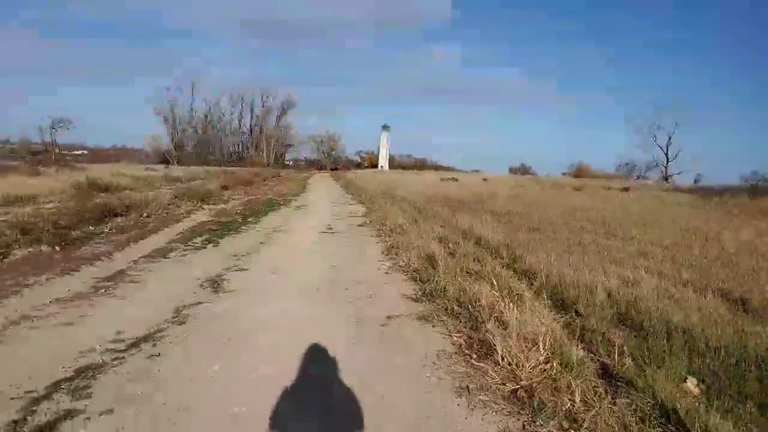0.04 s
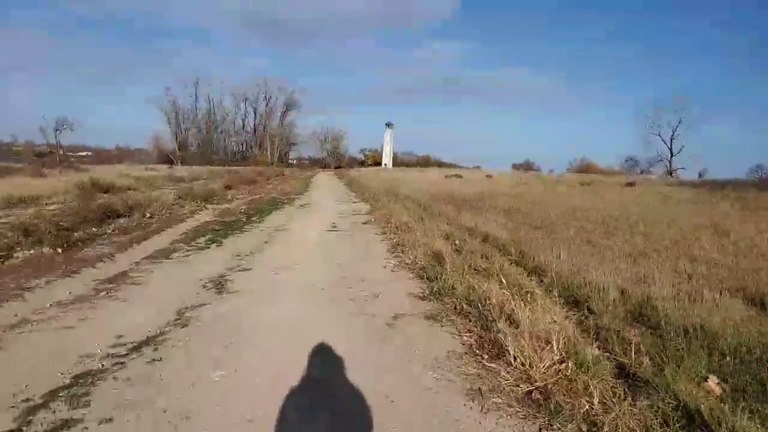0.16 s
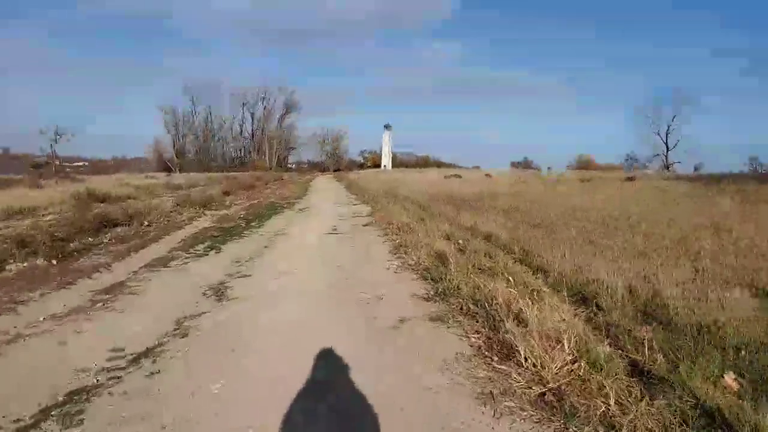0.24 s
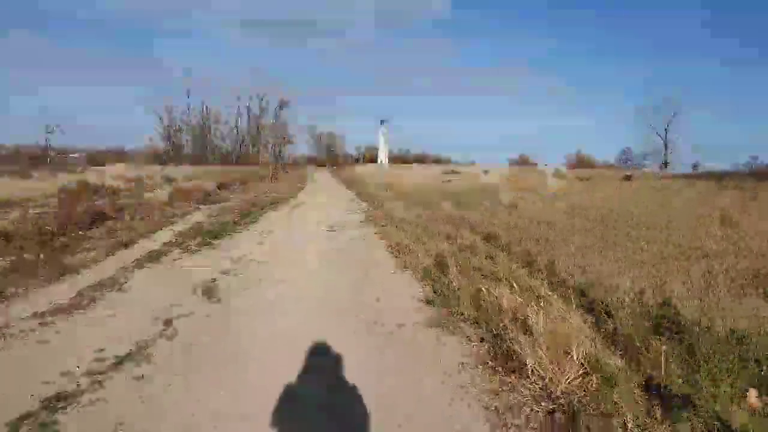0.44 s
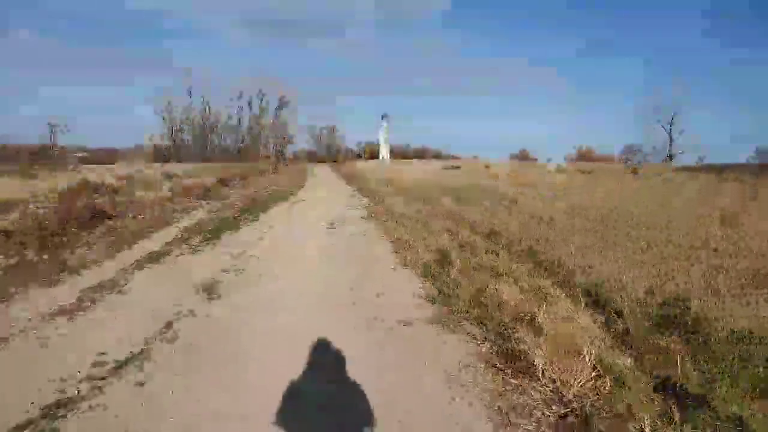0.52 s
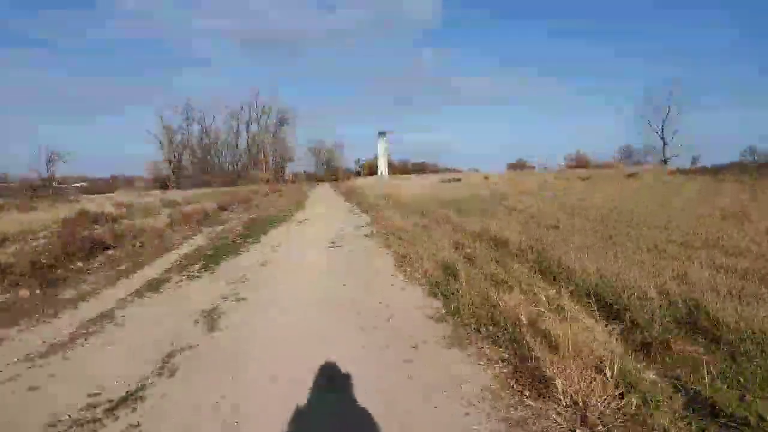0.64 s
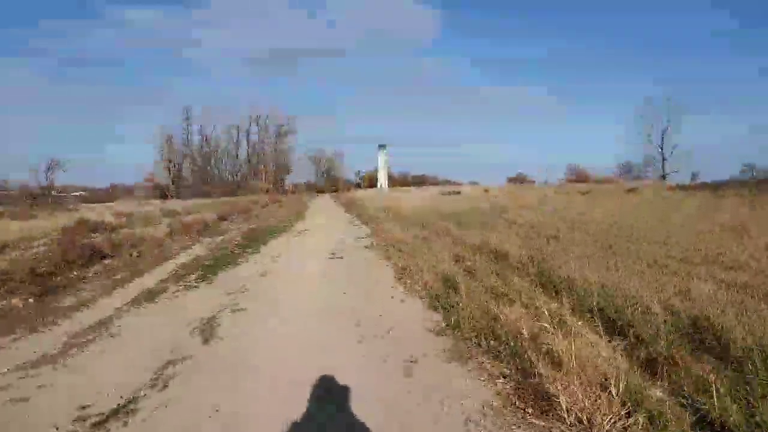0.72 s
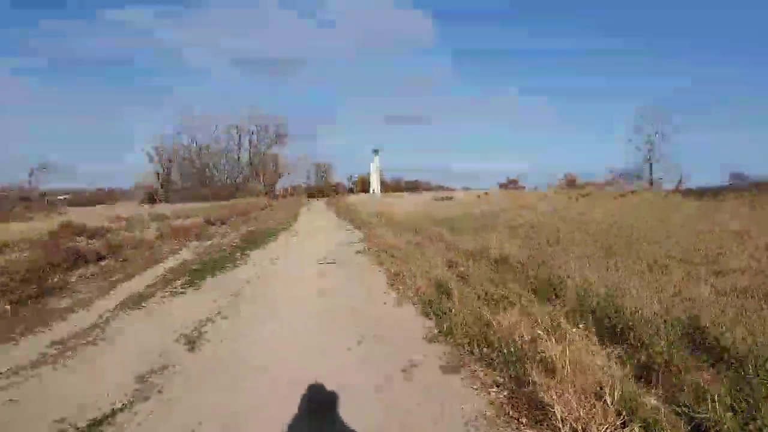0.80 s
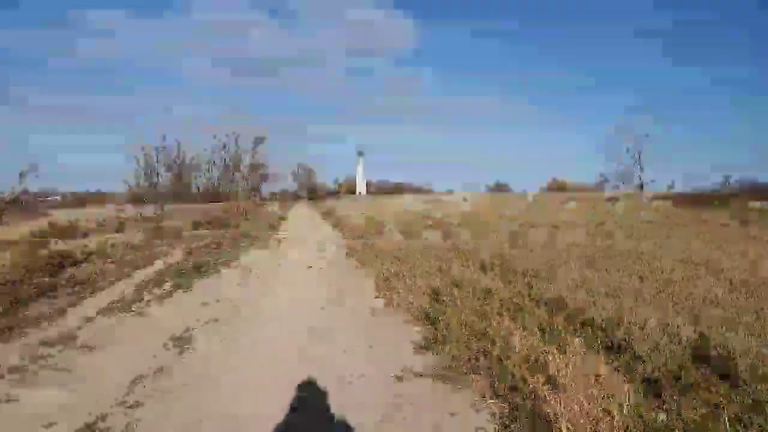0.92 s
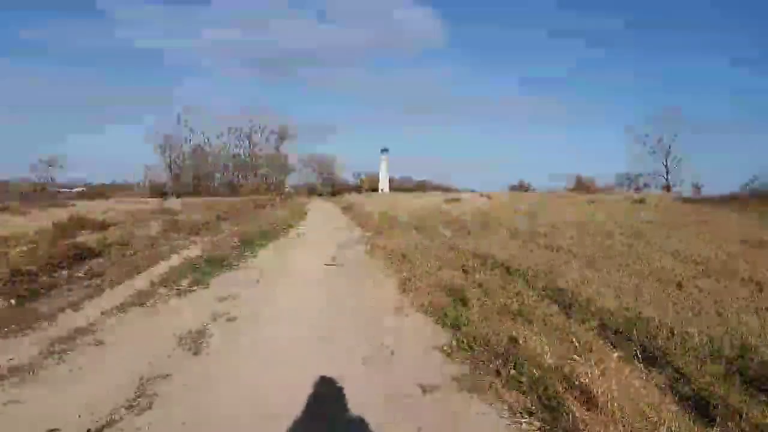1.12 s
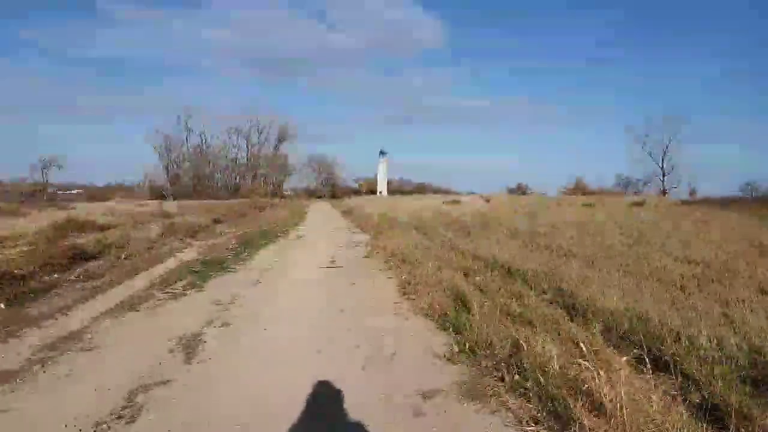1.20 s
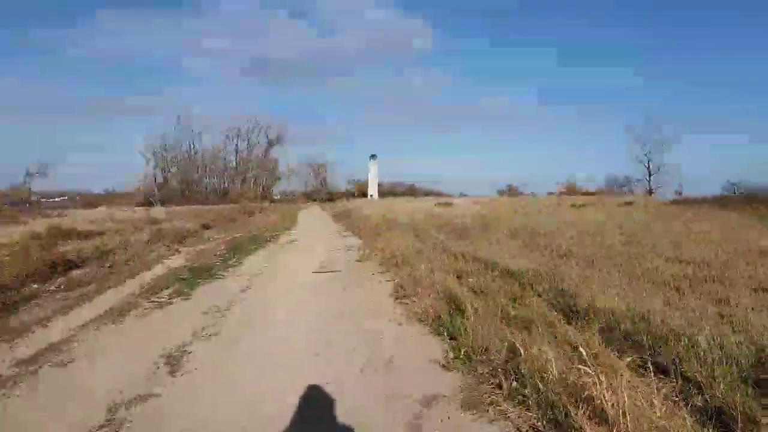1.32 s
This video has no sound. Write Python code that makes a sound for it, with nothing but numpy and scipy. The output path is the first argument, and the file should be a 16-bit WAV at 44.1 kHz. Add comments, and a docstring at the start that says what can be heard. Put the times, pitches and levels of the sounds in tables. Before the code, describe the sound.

Footsteps scuff and crunch lightly on a sandy track in open country while wind rumbles and puffs against the microphone. One sharp click sounds close by, then the wind drops, leaving thin hiss and faint insects.

```python
"""Someone walks along a sandy track in open country, carrying a microphone in the wind.
From the start gusts rumble and flutter in its two ports, over a thin hiss and faint insects.
Soles scuff the sand and crack grit while eddies strike as puffs, the hardest at 0.36 s.
One sharp click sounds close by at 0.52 s, and a second run of puffs follows. After 0.9 s the wind
drops away, and at 1.3 s a sole slides over loose sand as the next step begins."""
import sys
import numpy as np
from scipy import signal
from scipy.fft import rfft, irfft
from scipy.io import wavfile

SR = 44100
rng = np.random.default_rng(int(sys.argv[2]) if len(sys.argv) > 2 else 0)


def inscribe(sig):
    """Save sig as 16-bit PCM at rate SR to the path in sys.argv[1].

    A 1-D sig is mono; a 2-D sig holds one channel per row.
    Samples are clipped to [-1, 1] before scaling.
    """
    pcm = np.round(np.clip(np.atleast_2d(sig).T, -1, 1) * 32767)
    wavfile.write(sys.argv[1], SR, pcm.astype(np.int16))


N = 59535
TIME = np.arange(N) / SR
GRIT_LIKENESS, SAND_LIKENESS = 0.79, 0.67  # left-right correlation
# spectrum of a brittle crack (frequency [Hz], relative level [dB])
CRACK_SPECTRUM = [(200, -16), (700, 4.5), (1300, 1), (2000, 3.5), (2500, -3), (3500, 3), (4700, -4.5),
                  (6000, -6), (10000, -2.5), (15000, -26)]


def wind():
    """Turbulent pressure at the ports: a low rumble, and a hollow flutter that brightens in gusts."""
    # envelopes of flutter and rumble (time [s], relative level [dB])
    gusts = [(0, -49), (.022, -34.5), (.06, -41), (.095, -35), (.135, -42), (.185, -36), (.232, -28.5),
             (.265, -36), (.302, -28), (.318, -34.5), (.364, -23), (.39, -30.5), (.445, -40), (.485, -30),
             (.51, -39), (.565, -42), (.582, -35.5), (.61, -42), (.64, -26), (.68, -27), (.715, -35),
             (.745, -37), (.768, -33.5), (.795, -39.5), (.86, -40.5), (.9, -61.5), (.935, -51.5),
             (.96, -51), (.995, -54), (1.05, -71), (1.13, -64), (1.2, -75.5), (1.35, -72.5)]
    swells = [(0, -41.5), (.2, -43), (.232, -35), (.27, -42.5), (.36, -28), (.435, -40.5), (.485, -33),
              (.56, -32), (.6, -38.5), (.65, -32), (.725, -32), (.81, -37), (.845, -34.5), (.885, -50.5),
              (.97, -53.5), (1.0, -42), (1.03, -69), (1.09, -66), (1.13, -59), (1.2, -77.5), (1.25, -62.5),
              (1.35, -65)]
    # their spectra (frequency [Hz], relative level [dB])
    flutter_spectrum = [(30, -31), (120, -13.5), (220, -5.5), (310, -5), (380, -1.5), (520, -10),
                        (750, -14.5), (1100, -23), (1600, -33), (3000, -56.5), (8000, -58.5)]
    rumble_spectrum = [(10, -23), (30, -10.5), (48, -5), (70, 4), (110, -5.5), (170, -11.5), (300, -25.5),
                       (1000, -65)]
    lump_db, bright_from_db, bright_per_db = 3.5, -27.5, 0.0868
    gust_db = curve(gusts)
    flutter = turbulence(flutter_spectrum, steady_hz=30)
    flutter *= amp(lump_db * unit(lowpass(noise(), hz=73)))
    low = lowpass(flutter, hz=594)
    treble_gain = np.exp(bright_per_db * np.maximum(gust_db - bright_from_db, -10))
    flutter = low + (flutter - low) * treble_gain
    rumble = turbulence(rumble_spectrum, steady_hz=23)
    return flutter * amp(gust_db + 1.5) + rumble * amp(curve(swells) + 2.5)


def turbulence(spectrum, steady_hz):
    """Random pressure fluctuation: coloured noise, its slow level evened out by its running power."""
    pressure = colour(noise(), spectrum)
    power = abs(lowpass(pressure ** 2, steady_hz))
    return pressure / np.sqrt(power + 0.12 * np.mean(pressure ** 2))


def puffs():
    """A convected eddy swings the pressure for a cycle or two, at one port and then the other."""
    # (time [s], left peak [dB], right peak [dB], frequency [Hz], half length [s], right delay [s])
    eddies = [(.092, -28, -25, 566, 0.00076, .001), (0.201, -18, -24, 634, 0.0023, -0.0022),
              (0.2289, -15.5, -13.5, 410, .002, -.0007), (0.2395, -18, -16, 485, 0.0012, .007),
              (0.282, -26, -17.5, 384, 0.00092, -0.0064), (0.3005, -24.5, -16, 305, .002, -0.0028),
              (0.346, -20, -23, 490, 0.0027, -0.0025), (0.364, -5, -4.5, 360, .002, .0022),
              (0.3705, -13, -13.5, 390, 0.0018, .002), (0.47, -14, -21, 362, 0.0034, -0.0012),
              (0.4813, -18, -25, 353, 0.0014, 0.01), (0.4901, -19.5, -14.5, 430, 0.0013, .002),
              (0.581, -29, -37, 328, 0.0022, .001), (0.6437, -19.5, -17, 926, 0.00079, .0012),
              (0.668, -13, -10.5, 452, 0.0029, 0.004), (0.68, -8.5, -12.5, 297, 0.0026, .0003),
              (0.692, -14, -27.5, 411, .004, .002), (0.765, -20, -22.5, 350, 0.0017, .002)]
    phases = rng.random((len(eddies), 2, 1))  # in cycles
    out = np.zeros((2, N))
    for (centre, left_db, right_db, hz, half, delay), phase in zip(eddies, phases):
        age = TIME - centre - np.array([[0], [delay]])
        envelope = np.exp(1 - np.sqrt(1 + 3 * (age / half) ** 2))
        out += amp([[left_db], [right_db]]) * envelope * np.cos(2 * np.pi * (hz * age + phase))
    return out


def click():
    """A hard impact: a snap and damped modes, reaching the right port first."""
    # (frequency [Hz], peak level [dB], time to fall 60 dB [s])
    modes = [(590, -32, 0.021), (1050, -18.5, 0.013), (2000, -17.5, 0.014), (2880, -25.5, 0.0053),
             (3570, -17.5, 0.0043), (5600, -18.5, 0.0037), (7530, -24, 0.0043), (11130, -26.5, 0.004),
             (14400, -23, 0.002)]
    onset_s, left_delay_s, snap_decay_s = .5236, 0.000302, .0006
    age = np.maximum(TIME - onset_s - np.array([[left_delay_s], [0]]), 0)
    burst = noise(GRIT_LIKENESS) * (age > 0) * np.exp(-age / snap_decay_s)
    snap = colour(lowpass(burst, hz=9300), CRACK_SPECTRUM) * amp(-24)
    return snap + sum(amp(db - 60 * age / t60) * np.sin(2 * np.pi * hz * age) for hz, db, t60 in modes)


def grit():
    """Brittle fracture: small stones give way under a sole in decaying bursts, crisp or dull."""
    # (time [s], relative level [dB], decay time [s], left minus right [dB], treble cutoff [Hz])
    fractures = [(0.0607, -49.5, 0.0039, 10, 14100), (0.231, -44, 0.0088, 3, 9200),
                 (0.254, -27, 0.0007, -4, 4400), (.387, -39.5, 0.005, -21, 3500),
                 (0.395, -32, 0.0019, 1.5, 11950), (.532, -45.5, 0.0054, -25, 3460),
                 (0.6428, -33.5, .0012, -8, 6500), (0.657, -45, 0.0017, 7.5, 9050),
                 (.839, -44, 0.0018, 4, 3820), (0.874, -39.5, 0.0065, 1, 3230),
                 (0.973, -49.5, 0.0045, 1, 2500), (1.184, -58.5, .002, 5, 6000),
                 (1.315, -52, .008, 3, 2960)]
    out = np.zeros((2, N))
    for onset, db, decay, pan_db, cutoff_hz in fractures:
        gains = amp([[db + pan_db / 2], [db - pan_db / 2]])
        envelope = (TIME >= onset) * np.exp(-abs(TIME - onset) / decay)
        out += lowpass(noise(GRIT_LIKENESS) * gains * envelope, cutoff_hz)
    return colour(out, CRACK_SPECTRUM)


def scuffs():
    """Granular friction: sand grains of many sizes tick under the soles, over a smooth rubbing noise."""
    # envelope of the scuffing (time [s], level [dB])
    scuff_levels = [(0, -62), (.19, -58.5), (.24, -49), (.32, -52.5), (.385, -54.5), (.42, -57), (.47, -58),
                    (.57, -56), (.63, -57), (.66, -58), (.74, -60.5), (.82, -67), (.84, -52), (.87, -58.5),
                    (.895, -63), (.98, -76), (1.025, -74), (1.13, -76), (1.21, -75.5), (1.3, -76),
                    (1.35, -65)]
    # (frequency [Hz], relative level [dB])
    sand_spectrum = [(200, -15), (700, -8), (1400, 0.5), (2000, 1), (2500, -4.5), (3600, -3.5), (4700, -10),
                     (6000, -14), (9000, -14.5), (15000, -27.5)]
    grains_per_s, spread_db = 1200, 5
    grains = noise() * (rng.random((2, N)) < grains_per_s / SR)
    grains *= amp(spread_db * np.minimum(rng.exponential(1, (2, N)), 4))
    friction = unit(unit(grains) + 0.72 * noise(SAND_LIKENESS))
    return colour(friction, sand_spectrum) * amp(curve(scuff_levels))


def slide():
    """Sliding friction: fine sand hisses under a sole as the next step begins."""
    # rise of the hiss (time [s], level [dB])
    slide_levels = [(1.3, -85), (1.325, -66), (1.347, -50.5)]
    # (frequency [Hz], relative level [dB])
    slide_spectrum = [(800, -17), (3000, -5.5), (5500, -1), (8000, 3), (10500, -10.5), (15000, -3.5)]
    return colour(noise(SAND_LIKENESS), slide_spectrum) * amp(curve(slide_levels))


def rubs():
    """Dry swishes like brushing cloth: modulation shifts low noise to a band around a carrier."""
    # (centre time [s], half length [s], level [dB], centre frequency [Hz])
    swishes = [(0.27, 0.038, -53, 1960), (.46, 0.039, -54, 1894), (1.119, 0.032, -69.5, 1667)]
    out = np.zeros((2, N))
    for centre, half, db, hz in swishes:
        band = unit(lowpass(noise(likeness=0.62), hz=310) * np.sin(2 * np.pi * hz * TIME))
        out += amp(db) * np.exp(-((TIME - centre) / half) ** 2) * band
    return out


def hiss():
    """Broadband noise, uncorrelated between the ports, wavers thinly behind the steps."""
    # (time [s], relative level [dB])
    hiss_levels = [(0, -62), (.07, -58), (.18, -61.5), (.24, -60.5), (.35, -58.5), (.43, -67), (.52, -60),
                   (.6, -66), (.66, -61), (.76, -67.5), (.9, -64), (.99, -61.5), (1.025, -70), (1.2, -69.5),
                   (1.35, -66)]
    # (frequency [Hz], relative level [dB])
    hiss_spectrum = [(100, -2), (1000, 5.5), (2500, -3), (3800, -0.5), (4800, -0.5), (6200, 0), (7800, 2.5),
                     (9000, -3.5), (10500, -13.5), (12500, -2), (15000, -3), (16000, -16)]
    return colour(noise(), hiss_spectrum) * amp(curve(hiss_levels) + 4)


def insects():
    """Stridulation in the grass: each chirp is a fast run of wing strokes that sag in pitch."""
    # (start time [s], length [s], frequency [Hz], level [dB])
    chirps = [(.09, 0.11, 7850, -63), (.395, 0.098, 7820, -62), (.76, 0.094, 8000, -61),
              (1.095, 0.11, 7980, -70.5), (.775, 0.12, 7120, -62), (1.185, 0.12, 7050, -69)]
    strokes_per_s, sag_hz, rasp_rad = 92, 250, 0.97
    out = np.zeros((2, N))
    for start, length, hz, db in chirps:
        stroke = ((TIME - start) * strokes_per_s) % 1
        swell = np.sqrt(np.maximum(1 - (2 * (TIME - start) / length - 1) ** 2, 0))
        phase = 2 * np.pi * np.cumsum(hz + sag_hz * (.5 - stroke)) / SR
        rasp = rasp_rad * unit(lowpass(noise(), hz=170)) + 2 * np.pi * rng.random((2, 1))
        out += amp(db) * swell * np.sin(np.pi * stroke) ** 2 * unit(np.sin(phase + rasp))
    return out


def amp(db):
    """Amplitude ratio of a level in decibels."""
    return 10 ** (np.asarray(db) / 20)


def unit(x):
    """Normalisation to rms 1."""
    return x / np.sqrt(np.mean(x ** 2) + 1e-20)


def curve(points):
    """Linear interpolation of (time [s], value) points."""
    return np.interp(TIME, *np.transpose(points))


def colour(x, spectrum):
    """Minimum-phase filter of unit power gain, shaped by (frequency [Hz], level [dB]) points."""
    hz, db = np.transpose(spectrum)
    size = 8192
    log_hz = np.log(abs(np.fft.fftfreq(size, 1 / SR)) + 1)
    log_gain = np.log(amp(np.interp(log_hz, np.log(hz), db)))
    response = np.exp(np.conj(signal.hilbert(log_gain)))
    taps = np.fft.ifft(response).real[:size // 2]
    return signal.fftconvolve(x, taps[None] / np.linalg.norm(taps), axes=1)[:, :N]


def noise(likeness=0):
    """White noise in two channels whose correlation is the likeness."""
    left, independent = rng.standard_normal((2, N))
    return np.array([left, likeness * left + np.sqrt(1 - likeness ** 2) * independent])


def lowpass(x, hz):
    """Zero-phase low-pass, at half amplitude at the cutoff."""
    return irfft(rfft(x) / (1 + (np.fft.rfftfreq(N, 1 / SR) / hz) ** 4), N)


def scene():
    """Superposition of wind, click, walking and background at the two ports."""
    # the side that wind and scuffs favour (time [s], left minus right [dB])
    balance = [(0, -1), (.25, -2), (.42, -1.5), (.6, 0), (.75, -1), (.95, 0), (1.35, -5.5)]
    lean = amp(curve(balance) * np.array([[.5], [-.5]]))
    leaning = (wind() + scuffs()) * lean
    return leaning + puffs() + grit() + click() + slide() + rubs() + hiss() + insects()


def record(dry):
    """Band limiting: a steep linear-phase low-pass removes the highest treble."""
    cutoff_hz = 16100
    taps = signal.firwin(511, cutoff_hz, window=("kaiser", 9), fs=SR)
    return signal.oaconvolve(dry, taps[None], "same")


dry = scene()
out = record(dry)
inscribe(out)
```